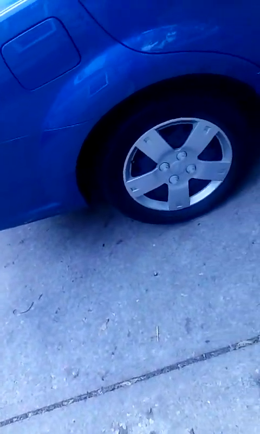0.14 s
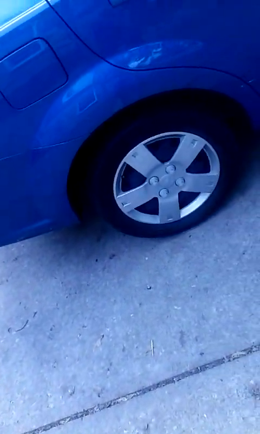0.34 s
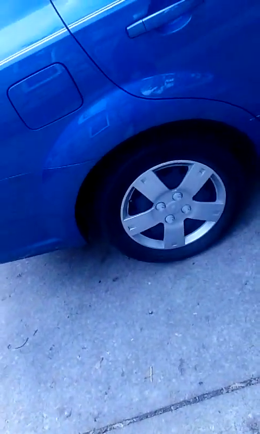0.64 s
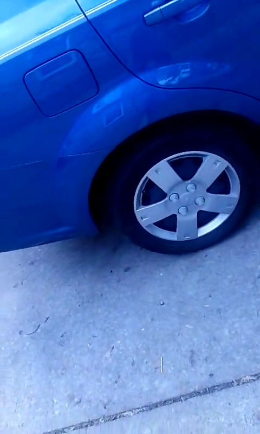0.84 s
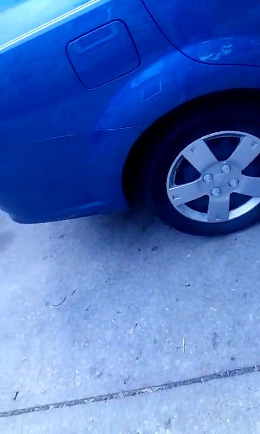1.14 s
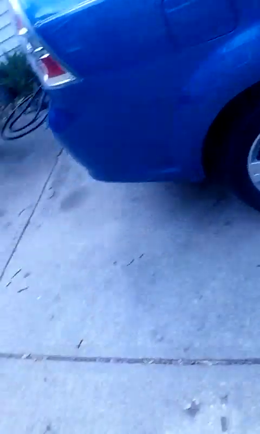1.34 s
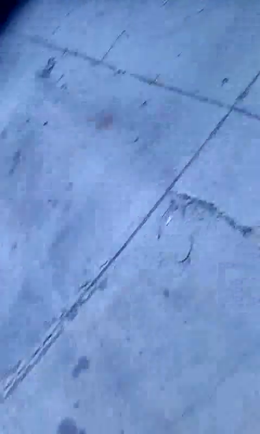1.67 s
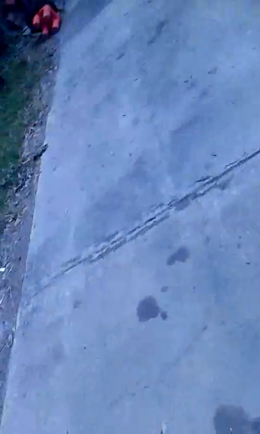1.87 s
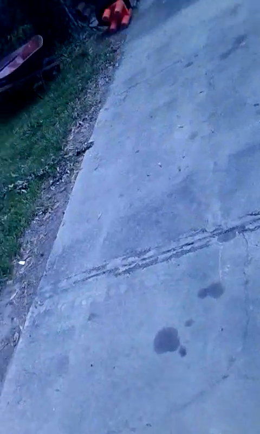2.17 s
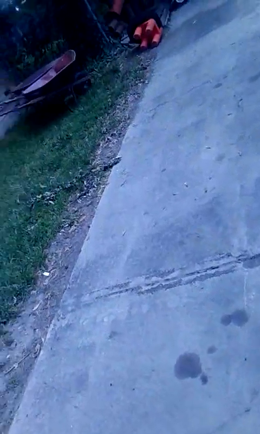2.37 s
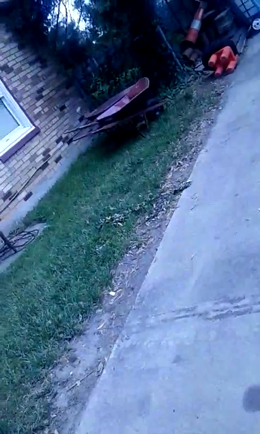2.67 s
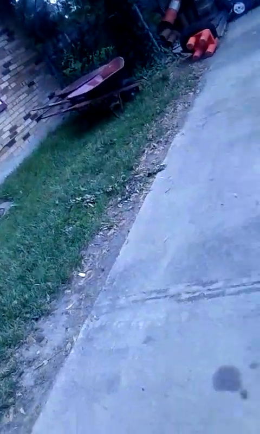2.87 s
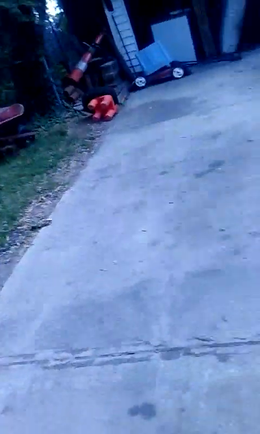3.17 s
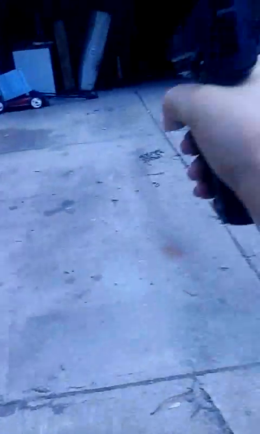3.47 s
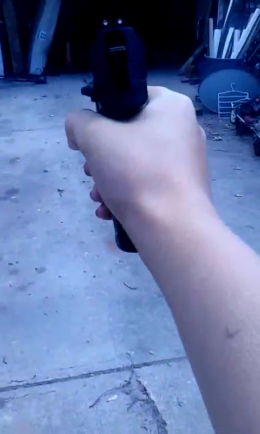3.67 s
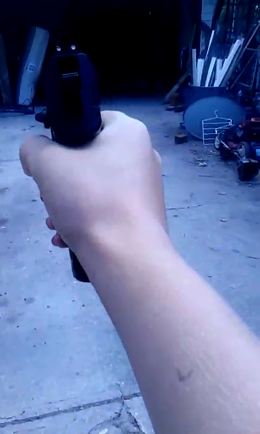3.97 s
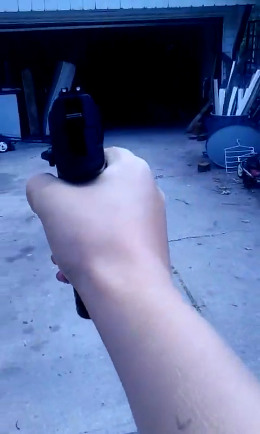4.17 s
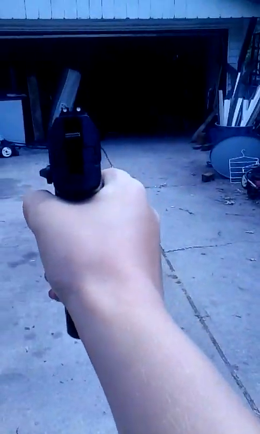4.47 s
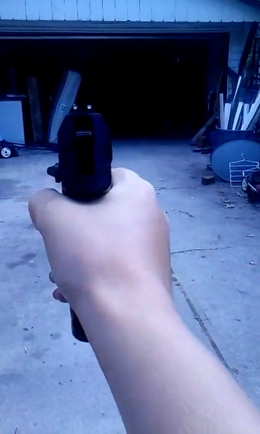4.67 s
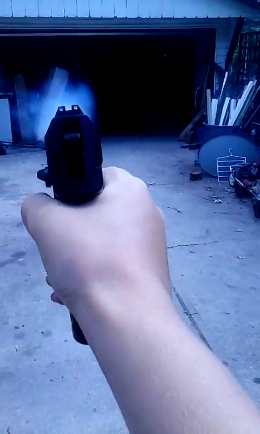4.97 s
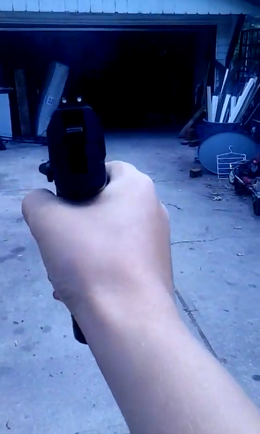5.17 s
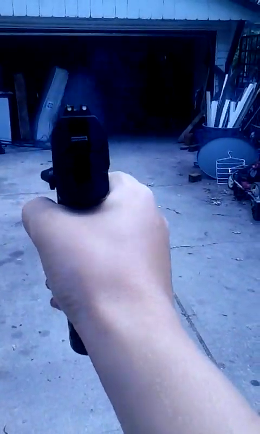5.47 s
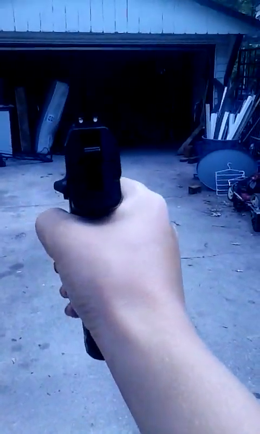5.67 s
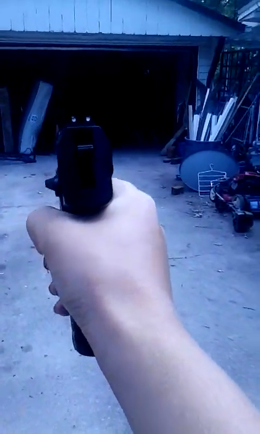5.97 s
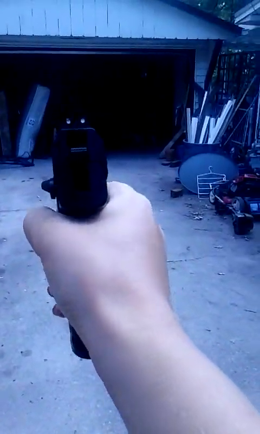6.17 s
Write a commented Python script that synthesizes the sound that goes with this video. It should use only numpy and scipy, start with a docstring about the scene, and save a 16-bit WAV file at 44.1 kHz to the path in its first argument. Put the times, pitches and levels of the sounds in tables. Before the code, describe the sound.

A quiet driveway heard through a close handheld microphone with faint steady hiss. From 0 to 1.7 seconds low wind rumbles and buffets, a distant engine drones, and a few dry handling snaps tick. Birds whistle short gliding notes around 1 to 1.9 and 2.2 to 2.9 seconds, with faint rasping chirps. The wind falls away near 1.7, leaving soft traffic murmur and hum. At 2.95 a gas-blowback airsoft pistol fires: a hammer click, punchy pop and hard metallic slide clack packed into a few hundredths of a second, overloading the microphone and slapping off walls and a hollow garage. A slight hiss trails it, then trigger clicks near 3.2. A small snap comes at 4.1 and a very faint high bird note at 4.8. Four similar shots follow at 5.05, 5.5, 5.87 and 6.17, quickening, with little metallic trigger clicks between and after them.

```python
"""Five sharp cracks of a CO2 blowback airsoft pistol in a driveway, close to the microphone: one, then four.
Each shot layers a hammer click, a gas blast of noise and barrel modes, and two slide knocks of noise and modes.
It overloads the microphone and echoes as decaying noise off house walls and a ringing garage.
Clusters of trigger clicks fall between shots, with dry handling snaps and a hiss trailing the first shot.
Birds whistle in sine glides and rasp in noise; noise wind rumbles at first; engine and traffic hum far away."""
import sys
import numpy as np
from scipy import signal
from scipy.fft import rfft, irfft
from scipy.io import wavfile
from scipy.ndimage import uniform_filter1d

SR = 44100
rng = np.random.default_rng(int(sys.argv[2]) if len(sys.argv) > 2 else 0)


def unload_audio(sound):
    """Save the sound as a 16-bit wav file, at the path given as the first command line argument."""
    columns = np.transpose(np.atleast_2d(sound))
    # keep every value between -1 and 1, then stretch to whole-number steps
    steps = np.round(np.clip(columns, -1, 1) * 32767)
    wavfile.write(sys.argv[1], SR, steps.astype(np.int16))


N = 279153
TIME = np.arange(N) / SR
AGE = TIME[:SR * 2 // 5]  # seconds since a hit, for sounds of 0.4 s

# Colour of a slide knock and of the wall slaps. Each row: frequency in Hz, relative gain in dB.
KNOCK_COLOUR = [(250, -21), (600, 2.5), (950, 0), (2700, -5.5), (4500, -11.5), (8000, -19), (15000, -24)]
# Colour of sound scattered round the yard. Each row: frequency in Hz, relative gain in dB.
YARD_COLOUR = [(47, -42), (80, -13), (343, -6.5), (418, -13), (532, -10), (791, -9.5), (1500, -12.5),
               (1670, -14.5), (1870, -17), (2540, -12), (3170, -18), (3700, -15), (4410, -24),
               (7830, -23.5), (15500, -37)]


def undb(db):
    """Decibels to amplitude gain."""
    return 10 ** (np.asarray(db) / 20)


def unit(x):
    """Scale to rms 1."""
    return x / np.std(x)


def noise(spectrum, size):
    """Noise of rms 1, coloured by rows of Hz and dB and falling away beyond the end points."""
    hz, db = np.transpose(spectrum)
    f = np.maximum(np.fft.rfftfreq(size, 1 / SR), 1)
    gain = undb(np.interp(np.log(f), np.log(hz), db))
    gain = gain * np.minimum(f / hz[0], 1) ** 2 * np.minimum(hz[-1] / f, 1) ** 4
    return unit(irfft(rfft(rng.standard_normal(size)) * gain, size))


def band(x, lo_hz, hi_hz):
    """Band-pass filter."""
    edges = [lo_hz, min(hi_hz, SR / 2 - 100)]
    return signal.sosfilt(signal.butter(2, edges, "band", fs=SR, output="sos"), x)


def fade(t60):
    """Exponential decay from the moment of a hit, down 60 dB after t60 seconds."""
    return np.exp(-np.log(1000) * AGE / t60)


def rise(seconds):
    """A contact builds up over a short time."""
    return 1 - np.exp(-(AGE / seconds) ** 2)


def walk(rate):
    """Smooth random drift of spread 1, with about `rate` new values a second."""
    k = int(SR / rate)
    steps = np.repeat(rng.standard_normal(N // k + 2), k)
    return unit(uniform_filter1d(steps, k))[:N]


def ring(modes, scatter_db, detune=0):
    """Modes struck together; every blow varies their levels, and their pitches by the fraction detune."""
    out = np.zeros(len(AGE))
    for hz, db, t60 in modes:
        level_chance, pitch_chance = rng.standard_normal(2)
        tone = np.sin(2 * np.pi * hz * (1 + detune * pitch_chance) * AGE)
        out += undb(db + scatter_db * level_chance) * fade(t60) * tone
    return out


def add(track, s, sound):
    """Mix a sound into the track at time s."""
    i = max(int(s * SR), 0)
    track[i:i + len(sound)] += sound[:max(N - i, 0)]


def click(bright_db, tick_db=-3, tick_t60=0.011):
    """Metal parts meet: a gritty tick of noise and the ring of frame and slide."""
    # Ringing of frame and slide. Each row: frequency in Hz, relative level in dB, t60 in seconds.
    gun_modes = [(896, 3, 0.033), (1630, -0.5, 0.036), (2283, 3, 0.031), (2605, 2, 0.02),
                 (2860, -19.5, 0.01), (3590, -1, 0.022), (4230, -5, 0.026), (5070, -19.5, 0.035),
                 (6980, -7.5, 0.018), (7700, -3.5, 0.024), (11100, -4.5, 0.016), (12060, -7, 0.018)]
    # Colour of the tick. Each row: frequency in Hz, relative gain in dB.
    tick_colour = [(500, -25), (2700, -1.5), (5700, -9.5), (8000, -1.5), (9200, -6), (11500, -7),
                   (15500, -13)]
    frame = .5 * ring(gun_modes, scatter_db=4.5, detune=0.025)
    tick = undb(tick_db + bright_db) * noise(tick_colour, len(AGE)) * fade(tick_t60)
    return (frame + tick) * rise(0.00049)


def blast(boom_db=8, boom_t60=0.025, barrel_db=4, jet_db=-12, open_s=.011,
          push_db=5, push_hz=150, push_t60=0.032):
    """The valve opens: a pressure swing, a turbulent bang, barrel ring, and a jet with a weaker hissing tail."""
    # Colours of the bang and of the gas jet. Each row: frequency in Hz, relative gain in dB.
    bang_colour = [(60, -5), (160, -6.5), (330, -4), (520, -6.5), (820, -1.5), (1200, -9.5), (1700, -4),
                   (3000, -5.5), (5500, -16), (9000, -21.5), (15000, -24.5)]
    jet_colour = [(300, -4), (1500, -11), (3000, -14), (5200, -6), (8000, 8), (15000, -7)]
    # Thump and ring of air in and around the barrel, kicked by the gas.
    # Each row: frequency in Hz, relative level in dB, t60 in seconds.
    barrel_modes = [(75.6, -8.5, 0.061), (289, 0.5, 0.026), (690, -1.5, 0.022), (840, 0.5, 0.012),
                    (1545, -3, 0.021), (2195, -3.5, 0.021), (2900, -16, 0.014)]
    push = undb(push_db) * np.sin(2 * np.pi * push_hz * AGE) * fade(push_t60)
    boom = undb(boom_db) * noise(bang_colour, len(AGE)) * fade(boom_t60)
    barrel = undb(barrel_db) * ring(barrel_modes, scatter_db=3.5, detune=0.029)
    valve = np.exp(-(AGE / open_s) ** 4) + .3 * fade(0.12)
    jet = undb(jet_db) * noise(jet_colour, len(AGE)) * valve
    return (push + boom + barrel + jet) * rise(0.0011)


def knock(t60, body_db=-3, metal_db=-19):
    """The slide slams against a stop: a crack of noise, a low modal knock and a metal click."""
    # The slide's low knock. Each row: frequency in Hz, relative level in dB, t60 in seconds.
    slide_modes = [(379, -8.5, 0.037), (944, -6, 0.024), (1200, 1, 0.016), (1558, 0.5, 0.013),
                   (1960, -6, 0.016), (2655, -3, 0.017), (3460, -4, 0.017)]
    crack = noise(KNOCK_COLOUR, len(AGE)) * fade(t60)
    body = undb(body_db) * ring(slide_modes, scatter_db=3.5)
    return (crack + body + undb(metal_db) * click(0)) * rise(0.00094)


def yard_echo(tail_db=-16.0, low_t60=0.39, high_t60=0.36, build_s=0.012, patchy_db=0.5,
              walls_db=-14, wall_t60=0.055, garage_db=-28.0, garage_s=.048):
    """The yard answers a shot: uneven scatter, blurred slaps from the walls and the ring of the garage."""
    # Distinct reflections. Each row: delay in seconds, level in dB relative to walls_db.
    wall_slaps = [(.027, -4), (0.0346, -8.5), (.045, -0.5), (.049, -8.5)]
    # The open garage ringing on. Each row: frequency in Hz, relative level in dB, t60 in seconds.
    garage_modes = [(229, -12, .25), (416, 8.5, 0.15), (618, -18, 0.14), (809, -11, 0.27), (1066, -10, .2),
                    (1510, -19, .2), (1685, -2.5, 0.16), (1992, -5, 0.25), (2130, -4.5, 0.2)]
    scatter = noise(YARD_COLOUR, len(AGE)) * undb(patchy_db * walk(249.6)[:len(AGE)])
    low = band(scatter, 40, 5400)
    tail = (low * fade(low_t60) + (scatter - low) * fade(high_t60)) * rise(build_s)
    echo = np.zeros(N)
    add(echo, 0, undb(tail_db) * tail)
    for delay, db in wall_slaps:
        slap = noise(KNOCK_COLOUR, len(AGE)) * fade(wall_t60) * rise(0.0023)
        add(echo, delay, undb(walls_db + db) * slap)
    garage = ring(garage_modes, scatter_db=5.0, detune=0.0074) * rise(0.0055)
    add(echo, garage_s, undb(garage_db) * garage)
    return echo[:len(AGE)]


def shots(hammer_db=-6, swing_db=-19, rear_db=4, close_db=-8.5, change=0.56):
    """Hammer, blast, slide back, slide home; the yard's echo changes only partly as the hand moves."""
    # Each row: hammer fall in seconds, delay to the slide's rear stop in seconds,
    # delay to its closing in seconds, blast gain in dB, echo gain in dB.
    firings = [(2.9449, 0.02, 0.033, 1, -0.5), (5.0420, 0.017, 0.027, -3.5, -3),
               (5.4972, 0.015, .0267, -1, -1.5), (5.8681, .0140, .0267, -4, 0),
               (6.1690, 0.013, .0265, -2.5, 0)]
    valve_lag_s = .005  # from the hammer's fall to the gas blast
    out, yard = np.zeros(N), yard_echo()
    for s, rear, close, db, echo_db in firings:
        # the sear lets go and the hammer swings
        add(out, s - .004, undb(swing_db) * click(0) * rise(0.006))
        add(out, s, undb(hammer_db) * click(bright_db=-2.0))
        add(out, s + valve_lag_s, undb(db) * blast())
        add(out, s + rear, undb(rear_db) * knock(t60=0.015))
        add(out, s + close, undb(close_db) * knock(t60=0.025))
        echo = (yard + change * yard_echo()) / np.hypot(1, change)
        add(out, s + valve_lag_s, undb(echo_db) * echo)
    return out


def spurt(s=3.058, hiss_db=-35, t60=0.32, whistle_hz=9700, whistle_db=-46):
    """A brief hiss with a thin whistling edge of narrow noise trails the first shot, probably stray gas."""
    out = np.zeros(N)
    hiss = noise([(2000, -6), (5000, 0.5), (9000, 3), (12000, -10), (15000, -13)], len(AGE))
    edge = unit(band(rng.standard_normal(len(AGE)), whistle_hz - 200, whistle_hz + 200))
    swell = np.exp(-((AGE - .035) / 0.016) ** 2)
    add(out, s, undb(hiss_db) * hiss * fade(t60) + undb(whistle_db) * edge * swell)
    return out


def latch(level_db=-6, link_db=-8, rattle_db=-6, rattle_s=.003, slip_db=-17, slip_s=.004, yard_db=-31):
    """A trigger part slips, catches and bounces, ringing the linkage and scattering faintly round the yard."""
    # Ringing of the trigger's linkage. Each row: frequency in Hz, relative level in dB, t60 in seconds.
    link_modes = [(2690, -1.5, 0.043), (2680, -2.5, 0.036)]
    out = np.zeros(N)
    bounce_s = slip_s + rng.uniform(.66, 1.5) * rattle_s
    for delay, db in ((0, slip_db), (slip_s, 0), (bounce_s, rattle_db)):
        linkage = undb(link_db) * ring(link_modes, scatter_db=5.0, detune=0.027)
        hit = click(0, tick_db=-1.5, tick_t60=0.027) + linkage
        add(out, delay, undb(level_db + db) * band(hit, 1220, 17000))
    add(out, slip_s, undb(yard_db) * noise(YARD_COLOUR, len(AGE)) * fade(1.0))
    return out[:len(AGE)]


def trigger(creep_db=-32, creep_s=.022, ease_db=-13, ease_s=0.043, count=2):
    """The finger eases off, the trigger clicks and resets; the next pull clicks and creeps in small ticks."""
    # The trigger let go. Each row: start in seconds, delay to the reset click in seconds,
    # gain of the first click in dB.
    releases = [(3.1584, 0.035, -31), (5.2731, 0.034, -27.5), (5.688, 0.018, -18), (6.022, 0.014, -17),
                (6.3074, .0133, -19)]
    # The trigger pulled again, taking up its slack. Each entry: start in seconds.
    pulls = [5.4113, 5.779, 6.0898]
    reset_db, pull_db = -20, -21.5  # gains on a latch click
    out = np.zeros(N)
    for s, reset, db in releases:
        add(out, s - ease_s * rng.uniform(0.67, 1.6), undb(db + ease_db) * latch())
        add(out, s, undb(db) * latch())
        add(out, s + reset, undb(reset_db) * latch())
    for s in pulls:
        add(out, s, undb(pull_db) * latch())
        for delay in np.cumsum(creep_s * rng.uniform(0.92, 1.0, count)):
            add(out, s + delay, undb(creep_db) * latch())
    return out


def handling(t60=0.019, bounce_s=0.011, bounce_db=-10):
    """Small dry snaps of noise, each with a duller bounce, as the microphone and pistol are handled."""
    # Each row: start in seconds, level in dB, tilt above 3 kHz in dB.
    snaps = [(0.068, -33, -14), (0.2067, -28, 0), (0.659, -38.5, -10), (2.1715, -35.5, -7), (4.09, -36, 4)]
    # Colour before the tilt. Each row: frequency in Hz, relative gain in dB.
    snap_colour = [(800, -2), (1600, 0), (2500, 4.5), (3400, -7), (7500, -10), (15000, -19)]
    out = np.zeros(N)
    for s, db, treble_db in snaps:
        colour = [(hz, d + treble_db * (hz > 3000)) for hz, d in snap_colour]
        snap = undb(db) * noise(colour, len(AGE)) * fade(t60) * rise(0.00068)
        add(out, s, snap)
        add(out, s + bounce_s, undb(bounce_db) * band(snap, 800, 3000))
    return out


def birds(song_db=0, waver=.011, taper=0.29, wet_db=-5.5, trees_t60=0.39, chirp_db=0):
    """Gliding sine whistles and short rasps of band noise, smeared by trees and houses."""
    # Whistled notes, each one bowed glide. Each row: start in seconds, length in seconds,
    # start pitch in Hz, middle pitch in Hz, end pitch in Hz, peak level in dB before flutter.
    notes = [(.8, .28, 8000, 8450, 9200, -69), (.985, 0.14, 2465, 2750, 2736, -43),
             (1.145, 0.11, 2630, 2394, 2000, -42.5), (1.248, 0.075, 2100, 2240, 2340, -48),
             (1.58, .27, 8100, 8500, 9100, -70), (1.60, 0.075, 3090, 3150, 3200, -47),
             (1.655, .03, 3260, 3400, 3330, -42), (1.675, 0.047, 3180, 2676, 2880, -35.5),
             (1.732, 0.1006, 1970, 2135, 2300, -44), (1.825, 0.109, 2310, 2126, 2017, -44.5),
             (2.243, 0.058, 2800, 2920, 3100, -48), (2.309, 0.048, 2050, 2080, 2120, -53),
             (2.349, 0.036, 2850, 2980, 3080, -44.5), (2.375, 0.097, 2620, 2443, 2465, -40.5),
             (2.456, 0.056, 2300, 2020, 2110, -46), (2.83, 0.065, 2630, 2280, 2160, -50),
             (2.885, 0.053, 3020, 3065, 3130, -44), (4.798, 0.36, 5480, 5210, 5230, -63)]
    # Rasping chirps of a farther bird. Each row: time in seconds (the swell starts 15 ms ahead),
    # pitch in Hz, level in dB before the swell.
    chirps = [(0.281, 3500, -54.5), (1.16, 3840, -58), (2.16, 4170, -55), (4.239, 3880, -58)]
    out = np.zeros(N)
    vibrato, flutter = 1 + waver * walk(170), undb(2.5 * walk(70))
    for s, length, start_hz, middle_hz, end_hz, db in notes:
        on = (TIME > s) & (TIME < s + length)
        curve = np.polyfit([0, .5, 1], [start_hz, middle_hz, end_hz], 2)
        glide = np.polyval(curve, (TIME[on] - s) / length)
        phase = 2 * np.pi * np.cumsum(glide * vibrato[on]) / SR
        envelope = signal.windows.tukey(len(phase), taper) * flutter[on]
        add(out, s, undb(song_db + db) * envelope * np.sin(phase))
    swell = np.hanning(int(.08 * SR))
    for s, hz, db in chirps:
        rasp = unit(band(rng.standard_normal(len(swell)), hz * 0.88, hz * 1.08))
        add(out, s - .015, undb(db + chirp_db) * swell * rasp)
    trees = rng.standard_normal(len(AGE)) * fade(trees_t60) * rise(0.0054)
    smear = signal.fftconvolve(out, trees / np.linalg.norm(trees))[:N]
    return out + undb(wet_db) * smear


def wind(buffet_db=1.04):
    """Eddies buffet the microphone as low noise: a breeze that drops to a lull, and single gusts."""
    # Colour of the rumble. Each row: frequency in Hz, relative gain in dB.
    wind_colour = [(12, -44), (20, -1), (64, -0.5), (129, -3.5), (225, -14), (263, -11), (365, -25.5),
                   (397, -23.5), (600, -32.5), (780, -70), (1320, -120)]
    # Each row: gust centre in seconds, half length in seconds (down to 1/e), level in dB before buffeting.
    gust_list = [(0.085, 0.022, -27.5), (0.198, 0.033, -28), (0.532, 0.035, -31.5), (0.682, 0.019, -27),
                 (0.975, 0.03, -27), (2.12, 0.14, -39.5), (4.47, 0.087, -41), (5.605, .7, -44.5)]
    breeze_db, slacken_db_per_s = -31.5, -3
    lull_s, drop_s, lull_db = 1.685, 0.047, -58
    drop = (1 - np.tanh((TIME - lull_s) / drop_s)) / 2
    breeze = undb(breeze_db + slacken_db_per_s * TIME) * drop
    gusts = [undb(db) * np.exp(-((TIME - s) / half) ** 2) for s, half, db in gust_list]
    strength = np.sqrt(breeze ** 2 + undb(lull_db) ** 2 + np.sum(np.square(gusts), axis=0))
    return noise(wind_colour, N) * strength * undb(buffet_db * walk(22))


def engine(waver=0.0049, flicker_db=3):
    """A far engine drones in sine harmonics of its firing rate, each fading in and out on its way."""
    # Each row: time in seconds, firing rate in Hz before the waver, gain on the harmonics in dB.
    course = [(0, 63.93, -50), (.6, 65.26, -40), (1.6, 66.98, -42), (1.8, 66.35, -50), (2.9, 63.6, -72)]
    # Each row: multiple of the firing rate, relative level in dB before the flicker.
    orders = [(1, 3.5), (2, -10.5), (3, -7.5), (4, -2), (5, -7), (6, -10), (7, -15.5)]
    s, hz, db = np.transpose(course)
    rate = np.interp(TIME, s, hz) * (1 + waver * walk(10.3))
    phase = 2 * np.pi * np.cumsum(rate) / SR
    drone = sum(undb(d + flicker_db * walk(5.19)) * np.sin(k * phase) for k, d in orders)
    return undb(np.interp(TIME, s, db)) * drone


def traffic(road_db=1, tyres_db=-1, hum_hz=100.0, hum_db=-49.0, rumble_db=-52):
    """A low noise murmur, tyre noise that comes and goes, and a rough hum taking over as the engine fades."""
    # Colour of the murmur. Each row: frequency in Hz, relative gain in dB.
    road_colour = [(25, 1), (60, -1.5), (100, 1), (120, -3), (142, 2.5), (175, -0.5), (250, -0.5),
                   (335, -4.5), (390, -2.5), (470, -7.5), (590, -11.5), (950, -9.5), (4500, -34.5)]
    # Each row: time in seconds, murmur level in dB, tyre level in dB, both before trim and drift.
    course = [(0.0, -49.5, -59), (1.53, -48.5, -57.5), (1.85, -52, -60.5), (2.17, -52.5, -57.5),
              (3.09, -47.5, -50.5), (3.3, -50.5, -57.5), (3.58, -49, -60), (4.14, -47.5, -53.5),
              (5.0, -48, -52.5)]
    s, low_db, high_db = np.transpose(course)
    road = noise(road_colour, N)
    # each level is set by the part of the noise that lies in a reference band
    road = band(road, 27, 1490) / np.std(band(road, 398, 1500))
    road = road * undb(road_db + np.interp(TIME, s, low_db) + walk(7))
    tyres = noise([(900, 3.0), (1600, 0.0), (2400, -1.0), (3300, -10.5), (4500, -17.5)], N)
    tyres = tyres / np.std(band(tyres, 1420, 2520))
    tyres = tyres * undb(tyres_db + np.interp(TIME, s, high_db) + 0.98 * walk(9.3))
    hum_phase = 2 * np.pi * np.cumsum(hum_hz * (1 + 0.0147 * walk(9))) / SR
    hum = np.sin(hum_phase) * undb(hum_db + 2 * walk(12))
    rumble = undb(rumble_db) * unit(band(rng.standard_normal(N), 89, 155))
    return road + tyres + (hum + rumble) * np.interp(TIME, [2, 2.6], [0, 1])


def microphone_hiss(level_db=-58.5):
    """The microphone's own steady noise."""
    # Each row: frequency in Hz, relative gain in dB.
    hiss_colour = [(1500, -2), (4000, -0.5), (8000, -1), (12000, -1), (15000, -0.5)]
    return undb(level_db) * noise(hiss_colour, N)


def scene():
    """Everything reaches one microphone, which adds its own hiss; both channels are alike."""
    pistol = shots() + spurt() + trigger() + handling()
    background = birds() + wind() + engine() + traffic()
    mono = pistol + background + microphone_hiss()
    return np.array([mono, mono])


def record(dry, ceiling=0.59, edge=0.093):
    """The microphone flattens the blasts; the recorder lifts the treble a little and cuts the top."""
    top_hz = 15900
    flat = dry / (1 + (dry / ceiling) ** 8) ** (1 / 8)
    crisp = flat + edge * np.diff(flat, prepend=0)
    return signal.sosfilt(signal.ellip(8, .2, 70, top_hz, fs=SR, output="sos"), crisp)


dry = scene()
out = record(dry)
unload_audio(out)
```